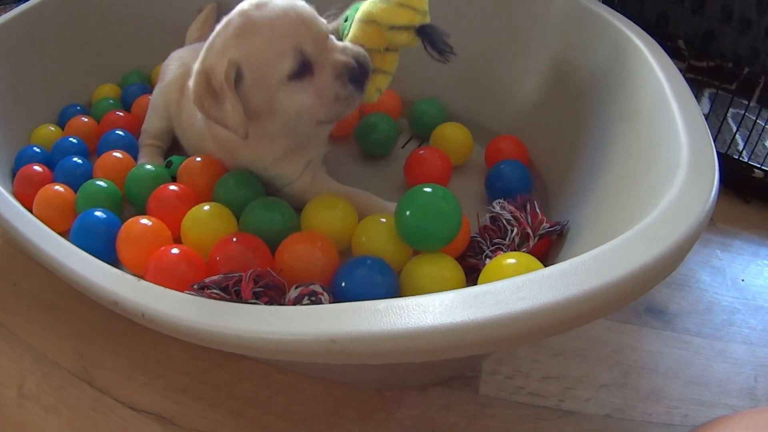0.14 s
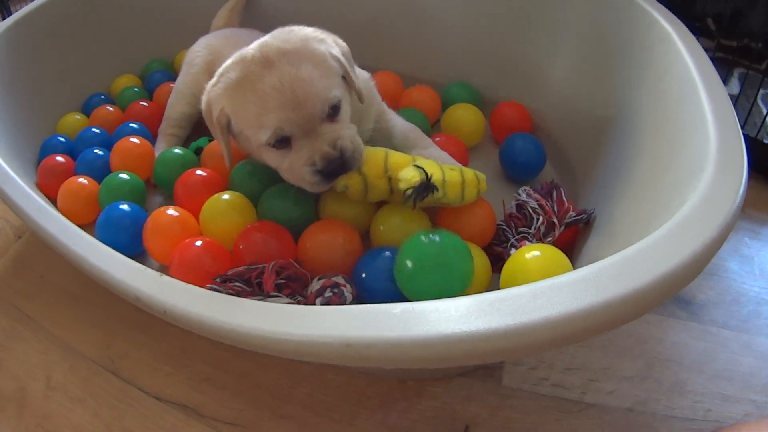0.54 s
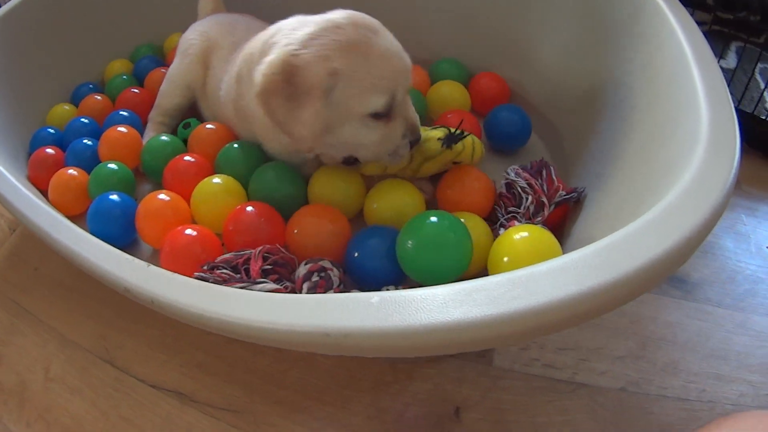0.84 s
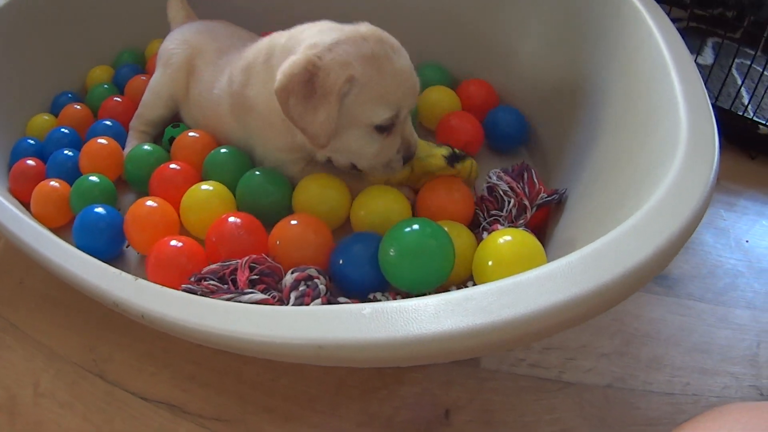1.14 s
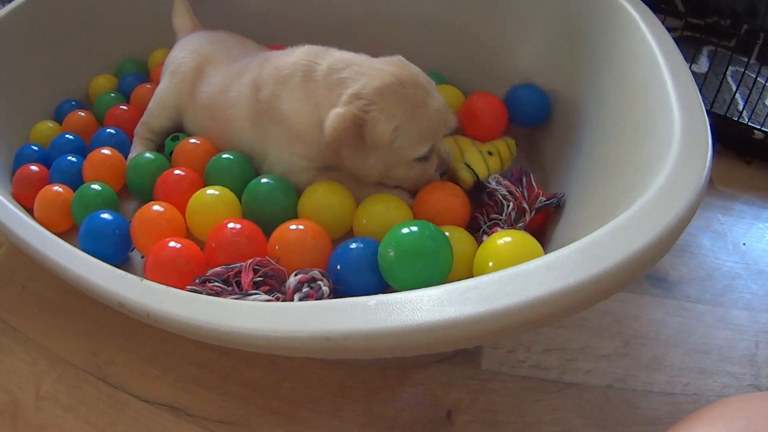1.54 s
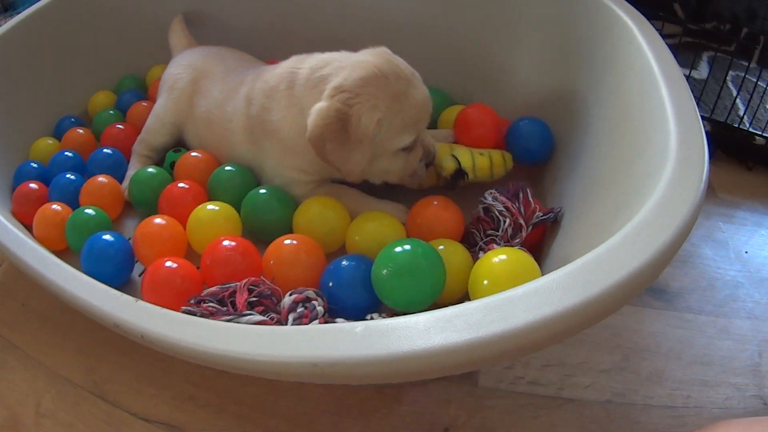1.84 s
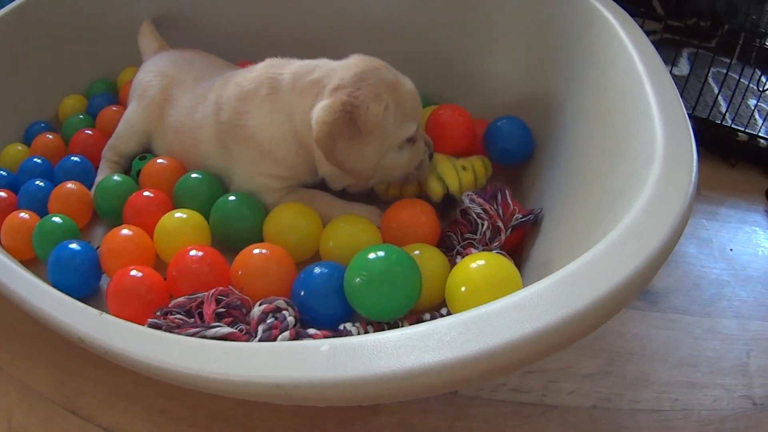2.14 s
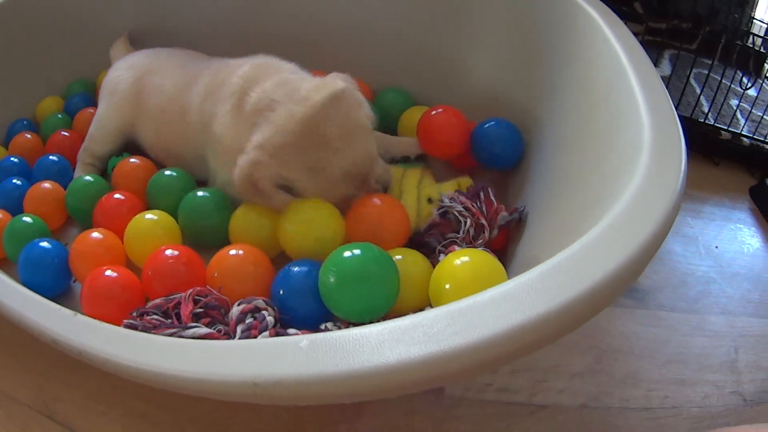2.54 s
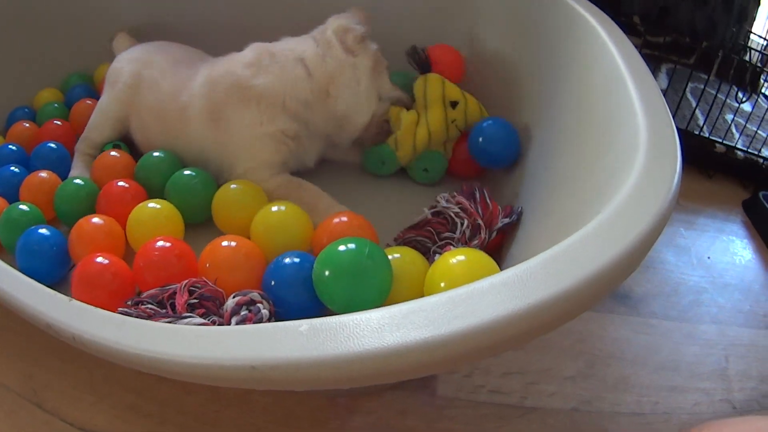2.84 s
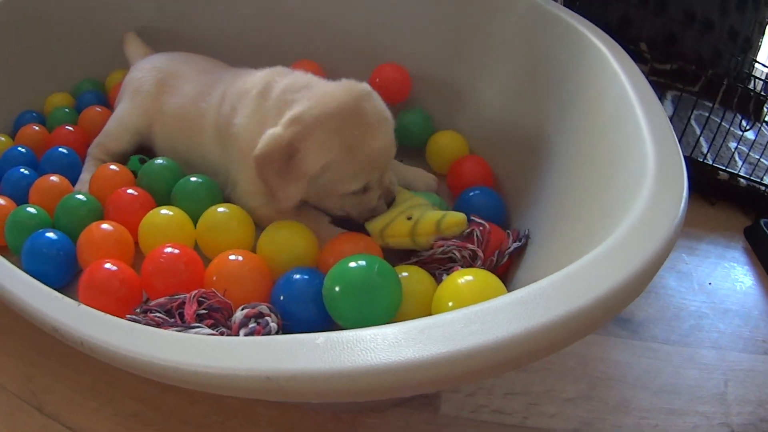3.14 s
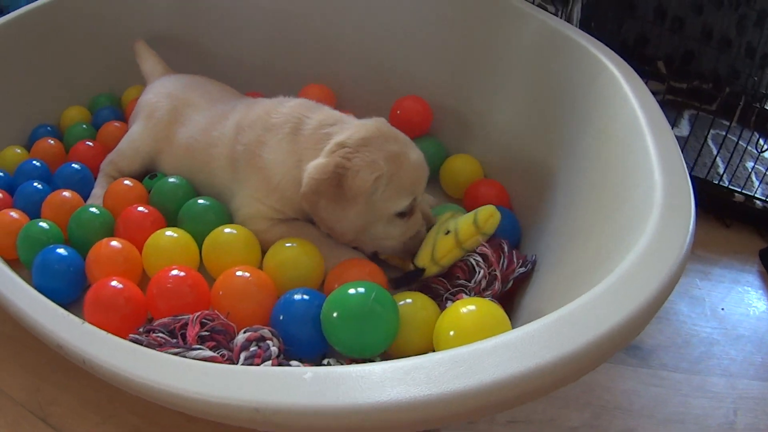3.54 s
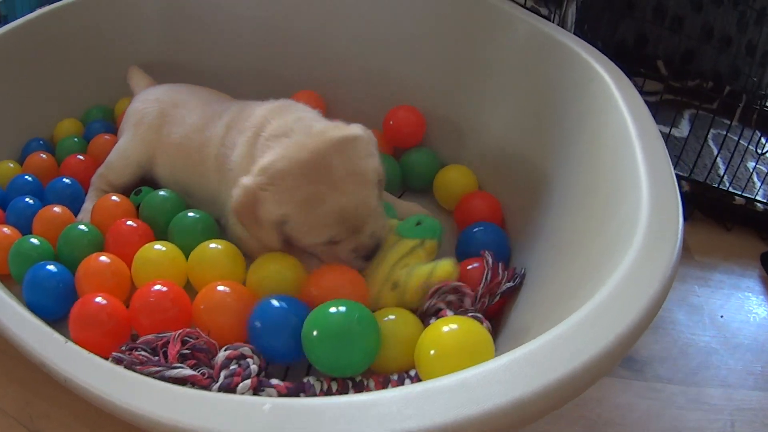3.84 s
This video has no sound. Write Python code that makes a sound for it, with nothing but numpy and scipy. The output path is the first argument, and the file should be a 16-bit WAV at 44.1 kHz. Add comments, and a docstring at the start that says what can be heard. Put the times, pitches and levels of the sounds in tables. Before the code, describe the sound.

Hollow plastic balls clatter, roll and rub in a tub as a puppy plays, with booming knocks in the first 0.7 seconds. Lighter ticks and fur brushing follow, with a brief clatter near 1.8 and soft paw drags around 2. The loudest flurry runs from 2.6 to 3.5 seconds. Claws click at 3.7, and a dull knock lands on the left at 3.8, over a low room hum.

```python
"""Puppy in a ball tub

A puppy tugs and shakes a soft toy in a plastic tub of hollow plastic balls, in a small room.
Balls tick against each other and knock on the tub, which booms; between knocks they roll and rub.
Fur and cloth brush the plastic, claws click and paws drag, over a low room hum.
Near the end, one dull knock lands off to the left."""
import sys
import numpy as np
from scipy import signal
from scipy.fft import rfft, irfft
from scipy.io import wavfile

SR = 44100
rng = np.random.default_rng(int(sys.argv[2]) if len(sys.argv) > 2 else 0)


def master(y):
    """Save y as 16-bit WAV."""
    cut = np.clip(np.atleast_2d(y).T, -1, 1)
    pcm = np.round(cut * 32767)  # scale
    wavfile.write(sys.argv[1], SR, pcm.astype(np.int16))


N = 176400
TIME_S = np.arange(N) / SR


def amp(db):
    """Decibels to gain."""
    return 10 ** (np.asarray(db) / 20)


def unit(x):
    """Scales to rms 1."""
    return x / np.sqrt(np.mean(x ** 2) + 1e-20)


def read(points, hz):
    """Reads a curve on a log-frequency axis."""
    f, value = np.transpose(points)
    return np.interp(np.log(hz + 1), np.log(f + 1), value)


def fader(points):
    """Gain over time from a dB curve."""
    return amp(np.interp(TIME_S, *np.transpose(points)))


def add(mix, start_s, sound):
    """Mixes a sound in at its start time."""
    part = mix[max(0, round(start_s * SR)):][:len(sound)]
    part += sound[:len(part)]


def colour(x, eq, size=4096):
    """Minimum-phase EQ of unit energy: only the shape of the curve counts."""
    log_gain = np.log(amp(read(eq, abs(np.fft.fftfreq(size, 1 / SR)))))
    taps = np.fft.ifft(np.exp(np.conj(signal.hilbert(log_gain)))).real[:size // 2]
    return signal.oaconvolve(x, taps / np.linalg.norm(taps))[:N]


def drift(rate_hz):
    """Smooth random wander of rms 1."""
    lowpass = np.exp(-(np.fft.rfftfreq(N, 1 / SR) / rate_hz) ** 2)
    return unit(irfft(rfft(rng.standard_normal(N)) * lowpass, N))


def slips(per_s, spread_db):
    """Random tiny impulses of uneven size."""
    size = amp(spread_db * np.minimum(rng.exponential(1, N), 3.5))
    return unit(size * rng.choice([-1, 1], N) * (rng.random(N) < per_s / SR))


# Tone of the quiet room: freq_hz, gain_db
AIR_EQ = [(20, -32), (40, -16), (58, -8), (75, -3.5), (100, -12), (145, -3.5), (220, -18.5), (320, -14.5),
          (570, -16.5), (1000, -21), (1300, -19), (1800, -24), (3300, -28), (6000, -30), (11000, -35.5)]
# How alike the room sounds left and right: freq_hz, correlation
ROOM_LIKENESS = [(60, 0.92), (130, 1), (270, 1), (570, 0.72), (1200, 0.21), (2600, 0.05), (5400, 0.43),
                 (11000, 0.69)]
# Partials of the hum: pitch_hz, level_db
HUM_PARTIALS = [(72, -52), (144, -58.5)]
def room_tone(noise_db=-47.5):
    """Steady room noise with a wavering low hum."""
    hz = np.fft.rfftfreq(N, 1 / SR)
    left, other = rfft(rng.standard_normal((2, N))) * amp(read(AIR_EQ, hz))
    same = read(ROOM_LIKENESS, hz)
    right = same * left + np.sqrt(1 - same ** 2) * other
    hum = np.zeros(N)
    for pitch_hz, db in HUM_PARTIALS:
        tone = np.sqrt(2) * np.sin(2 * np.pi * pitch_hz * TIME_S + .5 * drift(rate_hz=1.7))
        hum += amp(db) * tone * (1 + 0.22 * drift(rate_hz=12))
    return amp(noise_db) * unit(irfft([left, right], N)) + hum


# Resonances of the tub: pitch_hz, relative_db, t60_s
TUB_MODES = [(191.7, -25.5, 0.6), (224.5, -18.5, 0.05), (266.4, -6, 0.14), (277.5, 10, 0.047),
             (399, 0.5, 0.034), (479, -17.5, 0.19), (654, -15.5, 0.13)]
def tub_boom(force, rise_s=0.0032, gain_db=-1):
    """A push sets the tub's modes ringing."""
    t = np.arange(SR // 3) / SR
    ring = sum(amp(db - 60 * t / t60) * np.sin(2 * np.pi * hz * t) for hz, db, t60 in TUB_MODES)
    ring *= 1 - np.exp(-t / rise_s)
    return amp(gain_db) * signal.oaconvolve(force, ring / abs(ring).max())[:N]


# Fader ride of the rolling: time_s, level_db
ROLL_FADER = [(0, -38), (0.07, -54), (0.16, -32), (0.28, -33.5), (0.36, -45.5), (0.46, -41.5), (0.53, -27),
              (0.62, -32.5), (0.69, -46), (0.9, -42.5), (1.05, -51.5), (1.25, -45), (1.3, -33), (1.39, -51),
              (1.45, -36.5), (1.58, -42), (1.67, -46), (1.8, -31), (1.9, -43), (2.05, -46.5), (2.35, -49.5),
              (2.5, -46), (2.58, -26.5), (2.78, -32), (2.94, -29), (3.1, -34), (3.25, -36), (3.42, -33.5),
              (3.54, -49), (3.62, -43.5), (3.85, -45.5), (3.93, -38), (4, -44)]
# Its low rumble: freq_hz, gain_db
ROLL_EQ = [(60, -14), (120, -1.5), (200, -3.5), (275, 5.5), (335, 2), (470, 1), (620, -2.5), (850, -6.5),
           (1050, -19), (1600, -15), (2400, -22.5), (6000, -50)]
def rolling(gain_db=-4, tub_db=-11):
    """Seams and dents of rolling balls patter on the tub floor."""
    patter = slips(per_s=380, spread_db=1.5) * fader(ROLL_FADER)
    ring = unit(tub_boom(patter)) * patter.std()
    return amp(gain_db) * colour(patter, ROLL_EQ) + amp(tub_db) * ring


# Resonances of the ball shells: pitch_hz, width_hz, gain
SHELL_RINGS = [(7030, 120, 0.68), (9450, 150, 0.59)]
def shells(x):
    """The thin ball shells add narrow high rings."""
    return x + sum(gain * signal.lfilter(*signal.iirpeak(hz, hz / width, SR), x)
                   for hz, width, gain in SHELL_RINGS)


# Fader ride of the rubbing: time_s, level_db
RUB_FADER = [(0, -41), (0.06, -51), (0.25, -44.5), (0.35, -59), (0.45, -50.5), (0.52, -33), (0.62, -45),
             (0.8, -52.5), (1.15, -56), (1.25, -55), (1.3, -41), (1.37, -53.5), (1.58, -47), (1.8, -45),
             (1.92, -61), (2.5, -55.5), (2.57, -38.5), (2.75, -39.5), (2.92, -45), (3.35, -45), (3.5, -58),
             (3.75, -53.5), (4, -49)]
# Its hollow rasp: freq_hz, gain_db
RUB_EQ = [(200, -16.5), (700, 15.5), (1300, 6.5), (1800, 0.5), (2350, -9), (3000, 3), (3750, 5.5),
          (4700, 0.5), (6300, -8.5), (8000, -7), (11000, -10.5)]
def rubbing(gain_db=-2, clump_db=3.0):
    """Balls stick and slip against each other in small clumps."""
    grains = unit(slips(per_s=1300, spread_db=1.5) * amp(clump_db * drift(rate_hz=106)))
    return amp(gain_db) * shells(colour(grains * fader(RUB_FADER), RUB_EQ))


# Strokes of fur and cloth: start_s, rise_s, fall_s, level_db
BRUSH_STROKES = [(0.0, 0.013, 0.073, -45.5), (.4, 0.095, 0.063, -45.5), (1.641, 0.06, 0.27, -50),
                 (3.732, 0.15, .35, -47.5)]
# Their soft swish: freq_hz, gain_db
BRUSH_EQ = [(200, 6), (600, 19), (1300, -8), (2400, 3), (3700, 0.5), (5500, 2.5), (8000, 3.5), (11000, 0.5)]
def brushing(flutter_db=1.5, swell_power=0.69):
    """Fur and cloth slide over plastic with a soft hiss."""
    strokes = sum(amp(db) * np.interp(TIME_S, [s, s + rise, s + rise + fall], [0, 1, 0]) ** swell_power
                  for s, rise, fall, db in BRUSH_STROKES)
    hiss = rng.standard_normal(N) * amp(flutter_db * drift(rate_hz=75))
    return shells(colour(strokes * hiss, BRUSH_EQ))


# Contacts of ball, paw and tub, each layer's level before its mix gain:
# start_s, boom_db, knock_db, knock_pitch_hz, knock_decay_ms, clack_db, tick_db
CONTACTS = [(0.011, -18, -32.5, 522, 2.3, -30.5, -36), (0.105, -16.5, -20.5, 447, 0.86, -28.5, -32),
            (0.117, -11.5, -24, 383, 2, -33, -40), (0.154, -33, -22.5, 470, 1.9, -28.5, -31.5),
            (0.162, -15, -34, 440, 0.87, -38, -54), (0.235, -25.5, -33, 530, 1.4, -40.5, -47),
            (0.268, -22.5, -25, 440, 1, -30.5, -39.5), (0.498, -30, -20, 560, 1.04, -35, -42),
            (0.54, -29, -25.5, 790, 2.5, -33, -51), (0.591, -23.5, -17.5, 450, 1.1, -28, -31.5),
            (0.721, -39, -28.5, 517, 1.15, -38.5, -42.5), (0.737, -44, -21, 545, 0.64, -37, -59),
            (0.798, -35.5, -30, 570, 0.73, -48, -66), (0.833, -30, -37.5, 430, 1.3, -60, -57),
            (0.903, -39, -31.5, 490, 1.3, -43, -43.5), (0.934, -42, -35.5, 570, 0.58, -43.5, -47.5),
            (1.167, -40, -38.5, 716, 0.74, -53, -64), (1.268, -37, -30.5, 660, 1, -37, -42.5),
            (1.416, -33, -22, 630, 0.86, -41, -50), (1.432, -29.5, -27, 706, 0.7, -58, -52),
            (1.474, -26.5, -36, 380, 2.3, -62, -55), (1.561, -30, -29.5, 667, 1.4, -49, -43),
            (1.769, -30, -18, 630, 0.95, -21.5, -33), (1.787, -34, -34, 577, 2.7, -45, -41),
            (1.797, -41, -25.5, 534, 2.2, -44, -49), (1.81, -50, -30.5, 730, 0.9, -27, -44),
            (1.83, -47, -23, 630, 0.88, -36, -44), (1.966, -48, -42.5, 716, 2.1, -38, -48.5),
            (2.614, -32, -23, 560, 1.05, -34, -47), (2.645, -28, -23, 620, 1, -35, -32.5),
            (2.703, -21, -37, 530, 2, -41, -40), (2.812, -20, -41, 490, 0.99, -52, -52),
            (2.844, -17.5, -10, 607, 1.94, -37, -27.5), (2.909, -20, -13, 625, 1.67, -31, -27.5),
            (2.917, -30, -32, 610, 0.59, -30, -38), (2.944, -20, -27, 463, 1.5, -38, -35.5),
            (2.978, -36, -26, 560, 1.4, -27, -30.5), (3.01, -42, -13.5, 590, 1, -24, -24),
            (3.018, -26, -22, 486, 2.7, -29, -41), (3.067, -43, -26, 560, 1.2, -28, -32),
            (3.11, -39, -31, 780, 1.4, -36, -39), (3.149, -15.5, -14.5, 448, 1.37, -34, -29.5),
            (3.224, -25, -36, 480, 1.2, -35, -29.5), (3.387, -30, -29.5, 536, 2.2, -48, -42),
            (3.48, -17.5, -13, 457, 0.8, -41, -34), (3.542, -34.5, -31.5, 494, 1.4, -39.5, -51)]
# Hollow clack, bright tick and hard snap: freq_hz, gain_db
CLACK_EQ = [(200, -39), (550, 7), (850, 15.5), (1250, 8), (1700, 5), (2300, -5.5), (3500, -16.5),
            (11000, -47)]
TICK_EQ = [(300, -50), (1200, 10.5), (2400, 2), (3000, 4.5), (4000, 6), (5000, -1.5), (6300, -7.5),
           (8000, -6.5), (11000, -9.5)]
SNAP_EQ = [(300, -38), (1500, 1), (3500, -20), (6000, 1), (8000, 7.5), (11000, 1)]
def contacts(knock_rise=1.35, tick_decay_s=.001, scrape_gain=0.84):
    """Each contact: a scraping tick, a snap, a hollow clack, a brief knock and a push on the tub."""
    push, knocks, clacks, ticks, snaps = np.zeros((5, N))
    t = np.arange(SR // 25) / SR
    for start_s, boom_db, knock_db, pitch_hz, decay_ms, clack_db, tick_db in CONTACTS:
        age = 1000 * t / decay_ms
        swell = (age / knock_rise) ** knock_rise * np.exp(knock_rise - age)
        add(knocks, start_s, -amp(knock_db) * swell * np.sin(2 * np.pi * pitch_hz * t))
        add(push, start_s, amp([boom_db]))
        add(clacks, start_s, amp([clack_db]))
        grit = rng.standard_normal(len(t)) * rng.exponential(1, len(t))
        scrape = grit * t * np.exp(-t / tick_decay_s)
        scrape *= scrape_gain / np.linalg.norm(scrape)
        add(ticks, start_s - tick_decay_s, amp(tick_db) * scrape)  # peaks on the contact
        add(snaps, start_s, amp([tick_db]))
    body = tub_boom(push) + amp(3) * knocks + amp(22) * colour(clacks, CLACK_EQ)
    edge = amp(23) * colour(ticks, TICK_EQ) + amp(12.5) * colour(snaps, SNAP_EQ)
    return body + shells(edge)


# Ball scuffs, levels before the mix gains: start_s, length_ms, boom_db, body_db, scratch_db
BALL_SCUFFS = [(0.09, 13.5, -26, -34.5, -37.5), (0.2, 7.2, -22, -38, -38.5), (0.302, 7.3, -44, -35, -37),
               (0.496, 14, -44, -33, -29), (0.535, 13, -45, -34, -34), (0.678, 6, -50, -43, -38),
               (0.786, 4.6, -40, -55, -41), (1.281, 6.3, -49, -52, -43), (1.29, 8, -60, -37, -36.5),
               (1.317, 8.3, -52, -39.5, -36), (1.493, 5.7, -48, -50, -40), (1.574, 8.3, -28, -47, -39.5),
               (1.654, 9, -44, -48, -41), (1.705, 11.5, -31, -37.5, -38), (1.735, 8.4, -31.5, -34.5, -38),
               (2.569, 12, -21.5, -40, -36), (2.595, 5.1, -27, -46, -38), (2.637, 25, -22, -37, -30.5),
               (2.734, 7.4, -33, -34, -31), (2.747, 11, -25, -43, -40), (2.829, 9.6, -44, -45, -30.5),
               (3.046, 6, -38, -31, -33), (3.173, 12.5, -32, -38, -32), (3.265, 11.6, -26, -36, -31.5),
               (3.298, 7.9, -32, -32, -32), (3.331, 3.9, -40, -56, -41), (3.35, 15, -27.5, -31, -31),
               (3.403, 14, -37, -52, -42), (3.912, 10, -45, -46, -40.5)]
# Their midrange body and scratchy top: freq_hz, gain_db
SCUFF_BODY_EQ = [(200, -17), (450, 1.5), (700, 2), (1100, 2), (1700, 2), (2300, -11), (4000, -30.5),
                 (11000, -48)]
SCRATCH_EQ = [(300, -29), (1200, -9), (2400, -2.5), (3000, 2), (3800, 7), (4700, -6), (6200, -8.5),
              (8000, -6.5), (11000, -9.5)]
def scuffs(peak_share=0.17, slip_chance=.25):
    """A ball squeezes past another: a run of slips that swells and dies, and a push on the tub."""
    push, body, scratch = np.zeros((3, N))
    t_ms = np.arange(SR // 15) * 1000 / SR
    for start_s, length_ms, boom_db, body_db, scratch_db in BALL_SCUFFS:
        age = t_ms / (peak_share * length_ms)
        swell = age * np.exp(1 - age)
        grit = rng.standard_normal(len(age)) * rng.exponential(1, len(age))
        run = swell * grit * (rng.random(len(age)) < slip_chance)
        run *= np.linalg.norm(swell) / np.linalg.norm(run)
        add(push, start_s, amp([boom_db]))
        add(body, start_s, amp(body_db) * run)
        add(scratch, start_s, amp(scratch_db) * run)
    return (tub_boom(push) + amp(3.5) * colour(body, SCUFF_BODY_EQ)
            + amp(-1.5) * shells(colour(scratch, SCRATCH_EQ)))


# Bumps of the whole tub: start_s, level_db
TUB_BUMPS = [(.114, -41), (3.147, -25)]
# Their dull weight: freq_hz, gain_db
BUMP_EQ = [(15, 9), (45, -7), (130, 3.5), (300, -10.5), (700, -11), (3000, -67)]
def tub_bumps(decay_s=0.005):
    """The tub shifts on the floor with a short low thud."""
    force, t = np.zeros(N), np.arange(SR // 15) / SR
    for start_s, db in TUB_BUMPS:
        add(force, start_s, amp(db) * np.exp(-t / decay_s) * rng.standard_normal(len(t)))
    return colour(force, BUMP_EQ)


# Thin claw clicks: start_s, relative_db
CLAW_CLICKS = [(0.176, -46), (2.935, -45), (2.986, -47), (3.713, -35), (3.743, -40.5), (3.758, -50)]
def claws(gain_db=14.5, step_db=-4, body_db=5):
    """A claw touches plastic: three quick snaps, each softer, with a hollow body."""
    force = np.zeros(N)
    for start_s, db in CLAW_CLICKS:
        lags_s = np.sort(rng.uniform(0.00011, .003, 2))
        for k, lag_s in enumerate([0, *lags_s]):
            add(force, start_s + lag_s, amp([db + gain_db + step_db * k]))
    return shells(colour(force, SNAP_EQ)) + amp(body_db) * colour(force, CLACK_EQ)


# Paw drags: start_s, length_s, level_db
PAW_DRAGS = [(1.997, 0.13, -42), (2.122, 0.21, -46)]
# Their muffled tone: freq_hz, gain_db
DRAG_EQ = [(80, -27), (150, 2.5), (190, 0), (245, -1), (300, -13), (450, -22), (700, -14), (3000, -48)]
def paw_drags():
    """Paws judder softly over the tub floor."""
    pressure = np.zeros(N)
    for start_s, length_s, db in PAW_DRAGS:
        add(pressure, start_s, amp(db) * np.sin(np.pi * np.arange(0, length_s, 1 / SR) / length_s))
    return colour(pressure * slips(per_s=300, spread_db=2.5), DRAG_EQ)


# Dark tone of the knock on the left: freq_hz, gain_db
LEFT_KNOCK_EQ = [(15, -18), (50, 3), (130, 4), (300, 2.5), (700, 3.5), (900, -3), (1080, 4.5), (1300, -11),
                 (1700, -14), (2200, -31), (2800, -17), (3600, -34), (11000, -42)]
def left_knock(start_s=3.819, strike_db=-0.5, right_db=-5):
    """One dull knock with a low thud, off to the left."""
    force = np.zeros(N)
    add(force, start_s, amp([strike_db]))
    knock = colour(force, LEFT_KNOCK_EQ)
    return (knock + wall_echoes(knock)) * amp([[0], [right_db]]) + room_tail(knock)


def wall_echoes(x, gain_db=-8, decay_s=0.0094, per_s=2500, gap_s=.003, blocks=40):
    """Quick echoes between the tub's walls, changing as the balls move about."""
    t, out, hop = np.arange(SR // 12) / SR, np.zeros(N), N // blocks
    padded = np.pad(x, (hop, 2 * hop))
    window = np.sin(np.pi * np.arange(2 * hop) / (2 * hop))
    for k in range(blocks + 1):  # a fresh echo pattern for each overlapping block
        taps = rng.standard_normal(len(t)) * (rng.random(len(t)) < per_s / SR)
        taps *= (t > gap_s) * np.exp(-t / decay_s)
        echo = signal.fftconvolve(padded[k * hop:][:2 * hop] * window, taps / np.linalg.norm(taps))
        add(out, (k - 1) * hop / SR, echo[hop:] if k == 0 else echo)
    return amp(gain_db) * out


# Reverb time of the small room: freq_hz, t60_s
ROOM_DECAY = [(100, 0.27), (250, 0.46), (550, 0.35), (1400, 0.26), (4000, 0.085), (11000, 0.2)]
def room_tail(x, gain_db=-14.5, per_s=3000, predelay_s=.006):
    """A short diffuse tail, centred in the bass and wider in the treble."""
    size = SR // 2
    taps = rng.standard_normal((2, size)) * (rng.random((2, size)) < per_s / SR)
    taps *= np.arange(size) / SR > predelay_s
    hz, t, (left, other) = signal.stft(taps, SR, nperseg=256)
    same = read(ROOM_LIKENESS, hz)[:, None]
    right = same * left + np.sqrt(1 - same ** 2) * other
    decay = amp(-60 * t / read(ROOM_DECAY, hz)[:, None])
    tail = signal.istft(np.array([left, right]) * decay, SR, nperseg=256)[1]
    return amp(gain_db) * signal.fftconvolve(x[None], tail / np.linalg.norm(tail[0]), axes=1)[:, :N]


# Phase between the channels: freq_hz, left_lead_rad
PAN_PHASE = [(20, 0), (130, -.5), (260, -.9), (1100, -.75), (2500, -.5), (3800, -.05), (11000, 0)]
# Balance between them: freq_hz, left_minus_right_db
PAN_BALANCE = [(50, 2), (250, -0.8), (500, -1.5), (2000, -3.5), (11000, -3.5)]
def pan_right(x):
    """The tub lies a little to the right, so that side is mostly earlier and louder."""
    hz = np.fft.rfftfreq(2 * N, 1 / SR)
    lean = amp(read(PAN_BALANCE, hz) / 2) * np.exp(.5j * read(PAN_PHASE, hz))
    return irfft(rfft(x, 2 * N) * np.array([lean, 1 / lean]))[:, :N]


def scene():
    """Everything in the tub, its echoes, the knock on the left and the room."""
    play = contacts() + scuffs() + claws() + tub_bumps() + paw_drags()
    play = play + rolling() + rubbing() + brushing()
    treble = signal.lfilter(*signal.butter(2, 900, "high", fs=SR), play)
    width = wall_echoes(treble, gain_db=-9.5) * np.array([[1], [-1]])  # opposite polarity per side
    play = play + wall_echoes(play)
    return pan_right(play + room_tail(play)) + width + left_knock() + room_tone()


def record(dry):
    """A steep low-pass takes off the top octave."""
    lowpass = signal.firwin(511, cutoff=11120, window=("kaiser", 8), fs=SR)
    return signal.oaconvolve(dry, lowpass[None], "same")


dry = scene()
out = record(dry)
master(out)
```